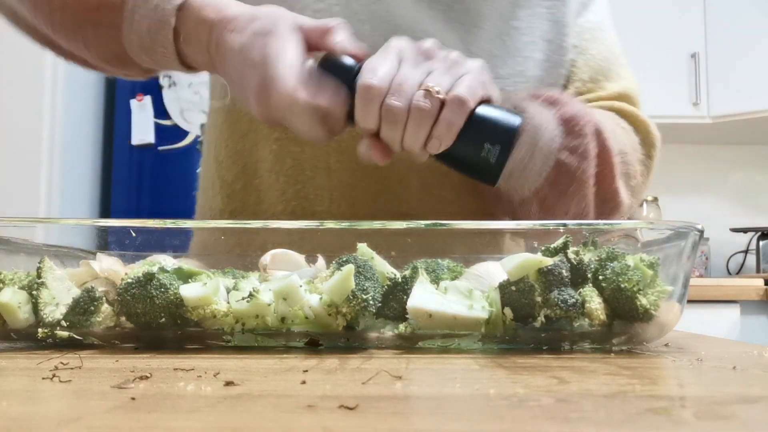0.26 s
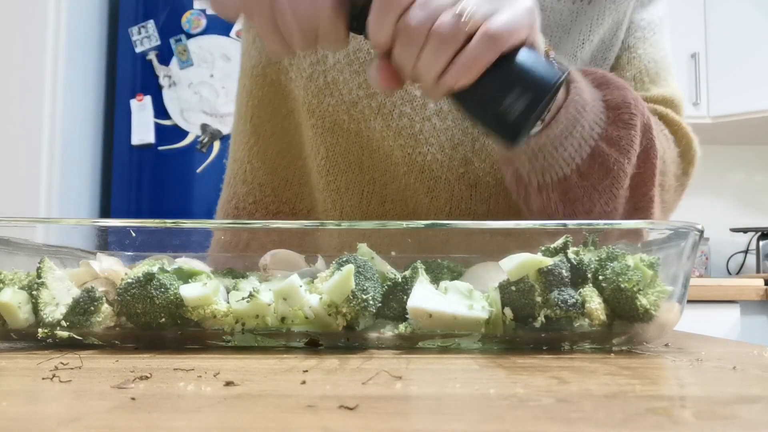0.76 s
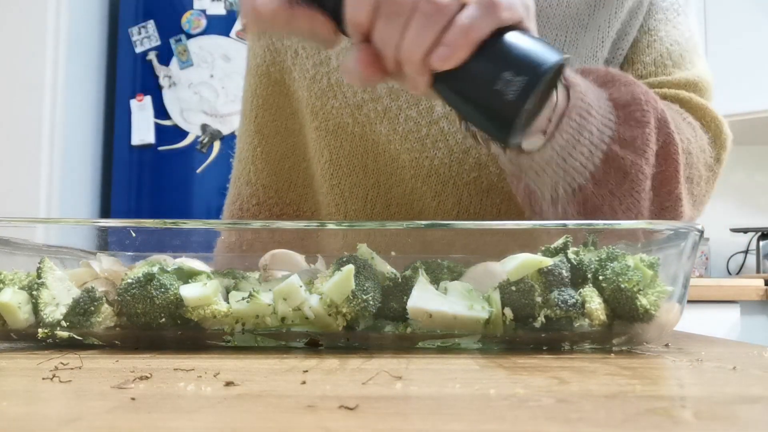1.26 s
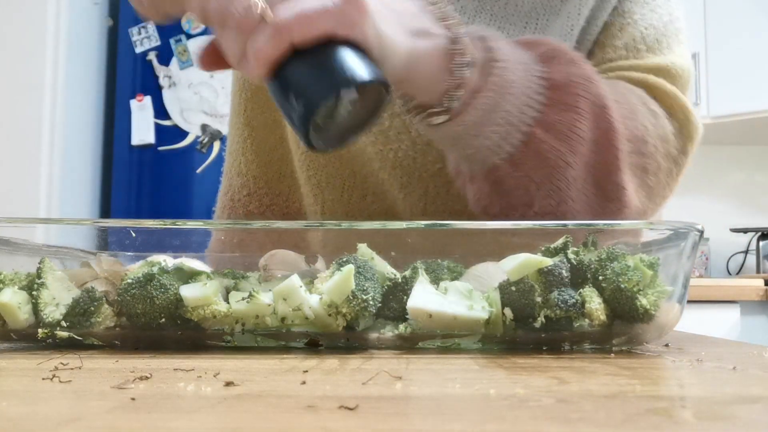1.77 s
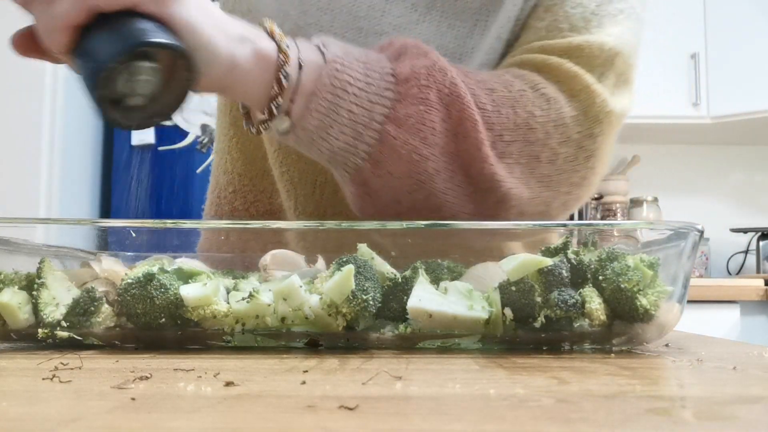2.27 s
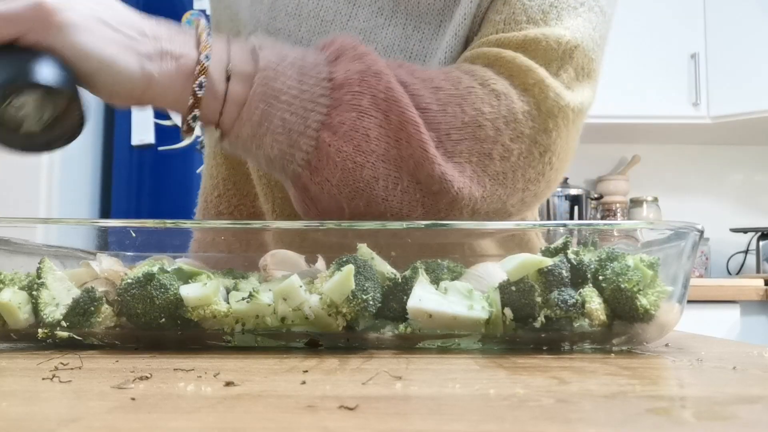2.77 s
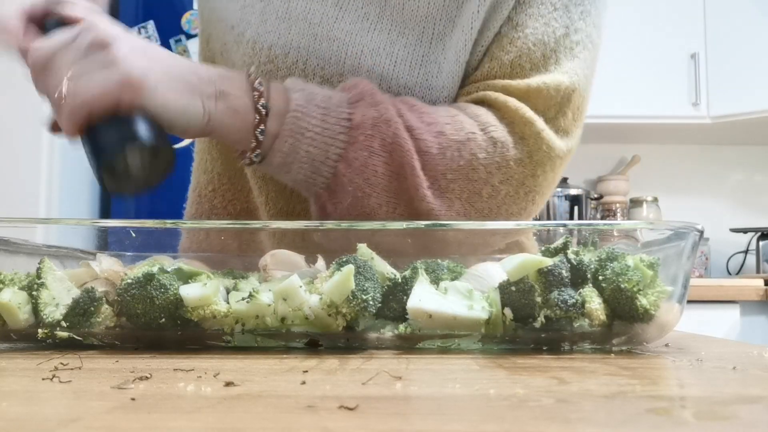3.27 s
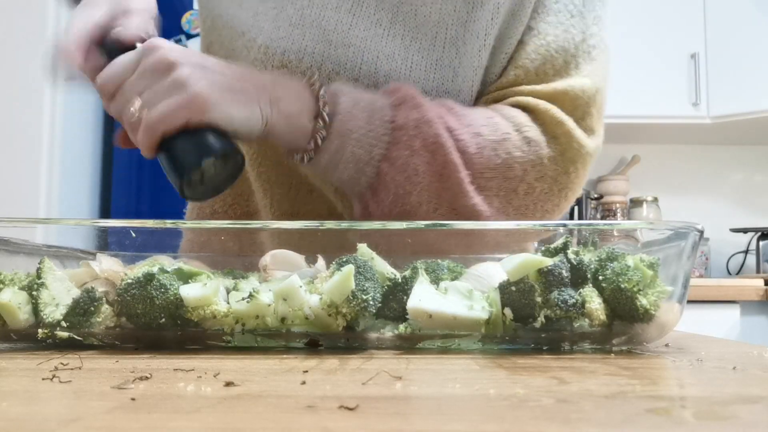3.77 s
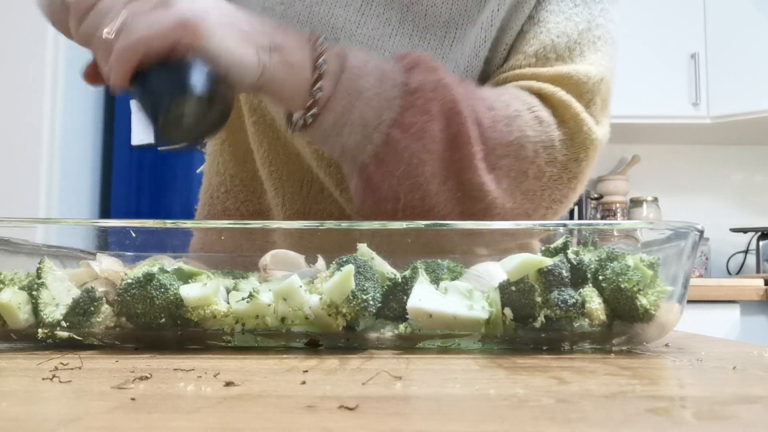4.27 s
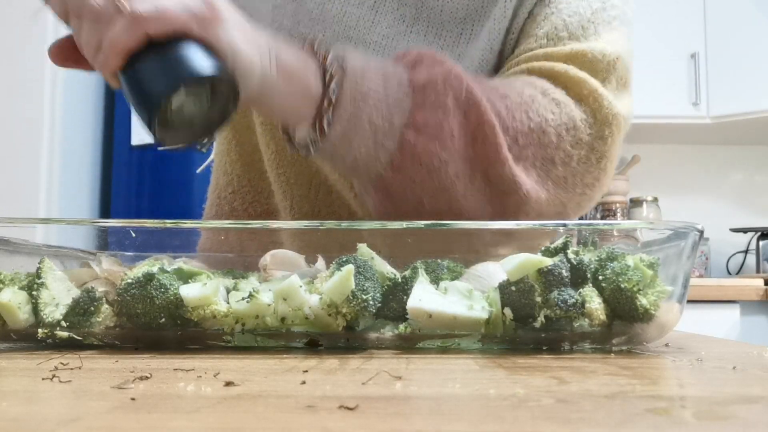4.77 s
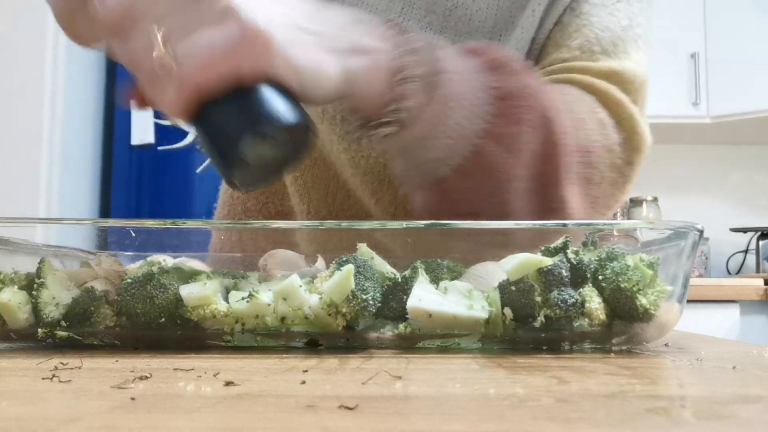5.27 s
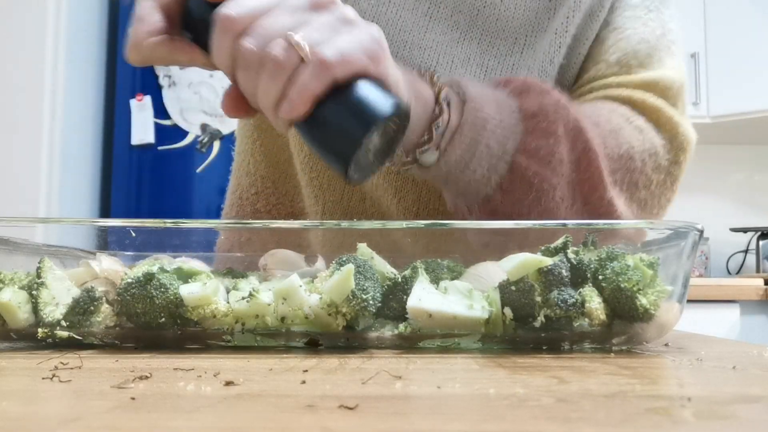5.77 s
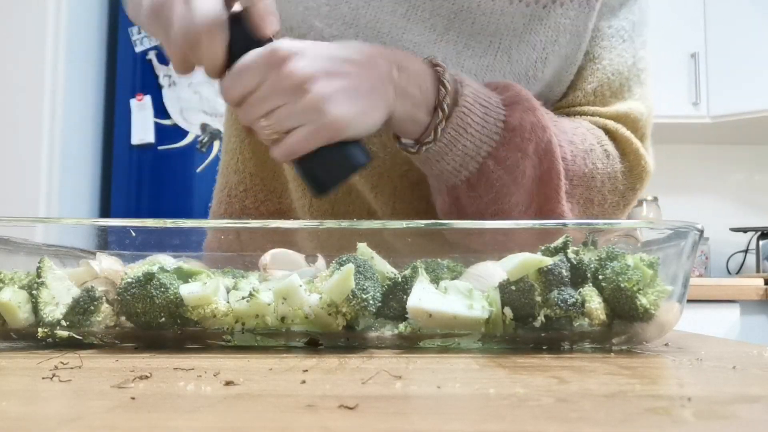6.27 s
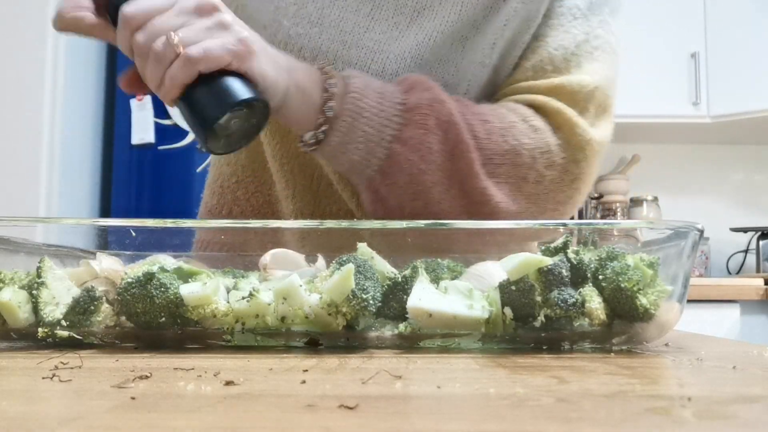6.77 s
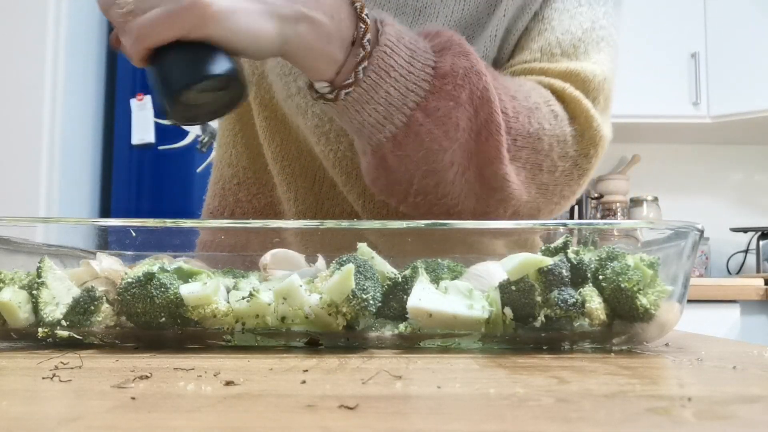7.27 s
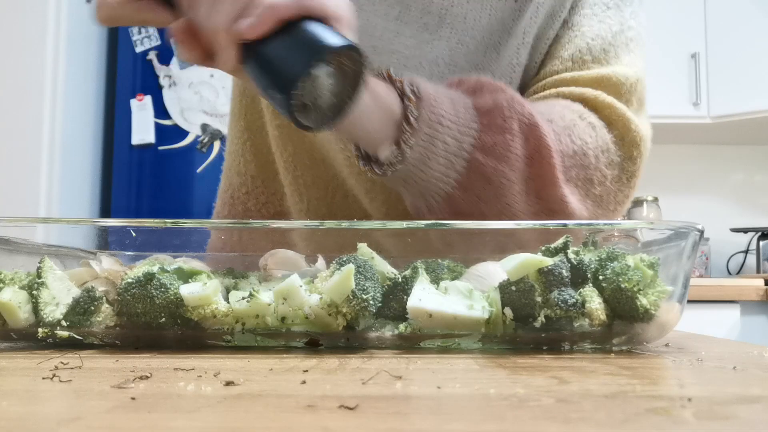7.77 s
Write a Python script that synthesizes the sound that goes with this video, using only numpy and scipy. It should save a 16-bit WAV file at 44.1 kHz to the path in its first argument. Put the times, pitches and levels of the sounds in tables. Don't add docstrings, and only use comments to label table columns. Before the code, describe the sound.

A hand pepper mill is twisted quickly back and forth close by, crunching peppercorns in steady gritty strokes with sharp little cracks in a lively kitchen.

```python
import sys
import numpy as np
from scipy import signal
from scipy.fft import rfft, irfft, next_fast_len
from scipy.io import wavfile
from scipy.ndimage import uniform_filter1d, map_coordinates

SR = 44100
rng = np.random.default_rng(int(sys.argv[2]) if len(sys.argv) > 2 else 0)


def output_pcm(signal):
    pcm = np.clip(np.atleast_2d(signal).T, -1, 1) * 32767
    wavfile.write(sys.argv[1], SR, np.round(pcm).astype(np.int16))


def natural_amplitude(level_db):
    exponent = np.asarray(level_db, float) / 20
    return 10 ** exponent


N = 353682

# start_s, left_minus_right_db, mouth_to_phone_db, loose_grip_db, burr_sizzle_db, burr_ring_db
MILL_POSE = [
    (0, 4, -7, 0, -25, 1),
    (.9, 3.5, -4.5, -6, -13, 7.5),
    (1.798, 2, -3.5, -2.5, -11, 8.5),
    (2.699, 2, 0, 2.5, -5, 6.5),
    (3.598, 1.5, 0.5, -1, -4.5, 6),
    (4.402, -1.5, -2, 0, -9, 6.5),
    (5.4, -2.5, 1, 6.5, -4, 4),
    (6.3, -2, -1.5, -4, -4.5, 5),
    (7.1, -1, -1, 2.5, -6, 5.5),
    (8.02, 0, 1, 2, -8.5, 7.5),
]
# centre_hz, width_hz, level_db
BODY_MODES = [(176, 170, -14), (340, 95, -5.5), (377, 114, -0.5), (578, 204, 3.5), (840, 147, 4.5),
              (800, 40, -6)]
SHELL_MODES = [(1210, 210, -9.5), (1420, 326, -0.5), (1936, 117, -0.5), (2440, 275, -0.5), (2904, 415, 5),
               (3694, 320, 2), (4430, 1250, -8.5)]
BURR_MODES = [(5824, 780, 13), (6320, 450, 9.5), (6770, 180, 20), (8300, 250, -24), (9500, 3300, 15.5),
              (11500, 3000, -23), (14900, 2000, -12)]
# start_s, length_s, crunch_db, body_rel_db, first_bite_rel_db
OUT_STROKES = [(0.059, 0.1, -31, -4.5, -3), (0.43, 0.085, -20.5, -7.5, -1), (0.755, 0.089, -21.5, -4, -3),
               (1.098, 0.092, -23, -6, -1), (1.454, 0.092, -23, -5, 3.5), (1.794, 0.06, -22, -8.5, 5),
               (2.11, 0.071, -24, -6, -2), (2.436, 0.076, -24.5, -6, -1), (2.787, 0.058, -25, -6, -3),
               (3.097, 0.076, -26, -6, -3), (3.404, 0.1, -26, -9.5, -2), (3.785, 0.053, -28, -3.5, -2),
               (4.067, 0.1, -28, -7.5, 5), (4.39, .085, -24, -9.5, 1.5), (4.75, .05, -29.5, -7.5, 16),
               (5.081, 0.06, -22, -7.5, 6), (5.408, .07, -26.5, -6.5, 6), (5.723, 0.067, -26, -5, 5.5),
               (6.039, 0.054, -28, -5.5, -3), (6.364, 0.088, -24.5, -2, 5.5),
               (6.72, 0.077, -26.5, -4.5, -4), (7.046, .08, -30, -7.5, 7), (7.349, 0.096, -28, -7, -18),
               (7.712, 0.042, -27.5, -11, 6)]
BACK_STROKES = [(.222, 0.11, -21.5, -7.5, 7), (.584, 0.074, -17, -7.5, -0.5), (0.924, .055, -21.5, -7, 3),
                (1.24, .11, -23.5, -5, 8), (1.589, 0.071, -21.5, -10, -9), (1.904, 0.1, -24, -4.5, 10),
                (2.24, 0.079, -23.5, -8, 4.5), (2.569, 0.08, -24.5, -6.5, 9.5),
                (2.898, 0.073, -24, -4.5, -6), (3.228, 0.067, -23, -3, -1), (3.553, 0.079, -25.5, -5, -7),
                (3.883, 0.097, -24.5, -5, 2), (4.197, 0.086, -23.5, -7.5, -9), (4.522, 0.058, -25, -4, -2),
                (4.852, 0.068, -26.5, -3, 9.5), (5.216, 0.057, -24.5, -5.5, 14),
                (5.526, .075, -28, -0.5, 14.5), (5.837, .08, -24.5, -4.5, 10), (6.167, 0.087, -26, 1, 10),
                (6.501, 0.088, -23, -3.5, 0), (6.847, 0.076, -24, -5.5, 9), (7.173, 0.074, -27.5, -3, 10.5),
                (7.484, 0.074, -25, -7.5, 7.5), (7.834, 0.088, -29.5, -2, -2)]


def on_log_axis(table, hz):
    f, v = np.transpose(table)
    return np.interp(np.log(np.maximum(hz, 1)), np.log(np.maximum(f, 1)), v)


def colour(x, table):
    n = next_fast_len(x.shape[-1])
    gain = natural_amplitude(on_log_axis(table, np.fft.rfftfreq(n, 1 / SR)))
    return irfft(rfft(x, n) * gain, n)[..., :x.shape[-1]]


def ring(x, hz, width_hz):
    r = np.exp(-np.pi * width_hz / SR)
    return signal.lfilter([1 - r, 0, r - 1], [1, -2 * r * np.cos(2 * np.pi * hz / SR), r * r], x)


def unit(x):
    return x / np.sqrt(np.mean(x ** 2, axis=-1, keepdims=True))


def hum():
    # frequency_hz, level_db
    rumble = [(20, 13), (50, 8), (120, 3), (300, -5), (1000, -27), (3000, -26), (8000, -37)]
    mid, side = colour(rng.standard_normal((2, N)), rumble)
    return unit(np.array([mid + 0.96 * side, mid - 0.56 * side])) * natural_amplitude(-51.5)


def kitchen(x, count=5, swing_s=0.045, gap_s=0.007):
    # frequency_hz, t60_s
    decay = [(100, 0.25), (400, 0.3), (1000, 0.49), (2000, 0.52), (4000, 0.59), (7000, 0.48), (14000, 0.15)]
    # frequency_hz, level_db
    cupboards = [(150, -7.5), (600, -6.5), (1500, 0.5), (3000, -2), (12000, 3.5)]
    # frequency_hz, side_minus_mid_db
    spread = [(60, -16), (200, -18), (500, -25), (900, -25.5), (1500, -7.5), (2500, -1.5), (4400, 3),
              (15000, -2)]
    tail_db, near_db, near_s = -6, -4, 0.0015
    t = np.arange(SR // 2) / SR
    tail = 0
    for hz in 100 * 2 ** np.arange(0, 7.5, 0.5):
        band = ring(rng.standard_normal((2, count, len(t))), hz, hz / 3)
        tail = tail + band * natural_amplitude(-60 * t / on_log_axis(decay, hz)) / np.sqrt(hz)
    near = rng.standard_normal(tail.shape) * np.exp(-t / near_s)
    late = colour(unit(tail * np.minimum(t / gap_s, 1) ** 2), cupboards)
    echoes = late * natural_amplitude(tail_db) + unit(near) * natural_amplitude(near_db)
    mid, side = echoes[0], colour(echoes[1], spread)
    place = np.arange(N) / SR / swing_s
    out = 0
    for k in range(count):
        away = np.abs((place - k + count / 2) % count - count / 2)
        here = x * np.cos(np.pi / 2 * np.minimum(away, 1))
        pair = np.array([mid[k] + side[k], mid[k] - side[k]])
        out = out + signal.fftconvolve(here[None], pair, axes=1)[:, :N]
    return out / np.sqrt(len(t))


def ports(x, lag_s=0.00003, bounce_s=(0.00047, 0.00044), bounce=0.22):
    def late(delay_s):
        return map_coordinates(x, [np.arange(N) - delay_s * SR], order=3)

    left = late(lag_s) + bounce * late(lag_s + bounce_s[0])
    right = x + bounce * late(bounce_s[1])
    return np.array([left, right])


def effort():
    rise_out, rise_back = 0.4, 0.59
    creep_s, creep = 0.042, 0.089
    t, speed, db = np.arange(N) / SR, np.zeros(N), np.zeros((3, N))
    twists = [(*row, rise_out) for row in OUT_STROKES] + [(*row, rise_back) for row in BACK_STROKES]
    for start, length, crunch_db, body_db, _, rise in sorted(twists):
        corners_s = [-creep_s, -0.005, 0, rise * length, length, length + 0.017]
        shape = np.interp(t - start, corners_s, [0, creep, 0.51, 0.87, 0.59, 0.06])
        speed = np.maximum(speed, shape)
        db[:, t >= start - creep_s / 2] = crunch_db + np.array([[body_db], [0], [0]])
    pose = np.transpose(MILL_POSE)
    sizzle_db = np.interp(t, pose[0], pose[4])
    return speed, db + np.array([[0], [0], [1]]) * sizzle_db


def stall(crack_s, depth=0.79, length_s=0.0022):
    marks = np.zeros(N)
    marks[((crack_s - length_s) * SR).astype(int)] = 1
    grip = np.convolve(marks, np.hanning(int(1.92 * length_s * SR)))[:N]
    return 1 - depth * np.minimum(grip, 1)


def crunch(crack_s, rate=1500, size_db=4, own_db=2.5, clump_db=2, grain_s=0.00017):
    def held(count):
        steps = np.repeat(rng.standard_normal(N // count + 1), count)[:N]
        return uniform_filter1d(steps, size=count // 2)

    speed, db = effort()
    hits = (rng.random(N) < rate / SR) * natural_amplitude(size_db * np.minimum(rng.exponential(size=N), 2.6))
    grain = np.exp(-np.arange(128) / (grain_s * SR))
    puffs = np.convolve(hits, grain)[:N] * natural_amplitude(clump_db * held(300)) * speed * stall(crack_s)
    out = 0
    for modes, group_db, trim_db in zip((BODY_MODES, SHELL_MODES, BURR_MODES), db, (-8.5, -7, -7)):
        group = 0
        for hz, width_hz, mode_db in modes:
            strength = natural_amplitude(mode_db + own_db * held(512) + 1.13 * held(3000))
            group = group + strength * ring(puffs * rng.standard_normal(N), hz, width_hz)
        out = out + unit(group) * natural_amplitude(uniform_filter1d(group_db, size=200) + trim_db)
    return out


def corns(count=3):
    # start_s, peak_db, burr_sizzle_rel_db
    splits_out = [(.4576, -7, -18), (.468, -10, -20), (.78, -8.5, -3), (.7938, -9.5, -17),
                  (.8242, -18, -14), (1.1198, -22, 4), (1.48, -16, -1), (1.7763, -16, -18),
                  (1.8082, -13, -8), (2.125, -18, -18), (2.4761, -14.5, -10), (2.7994, -17.5, -1),
                  (3.101, -24, 4), (3.1132, -17, 2), (3.4749, -20, -15), (3.7515, -20, -10),
                  (4.1108, -17.5, 6), (4.4102, -13, -3), (4.44, -15.5, 4), (4.727, -19, -12),
                  (4.7677, -16.5, -3), (5.0845, -13.5, -5), (5.0962, -22, -4), (5.4355, -25, -5),
                  (6.0495, -17.5, -10), (6.393, -22.5, 7), (7.0667, -15.5, -11), (7.0883, -13.5, 2.5),
                  (7.3793, -12.5, 1.5), (7.733, -21.5, 5)]
    splits_back = [(.332, -14.5, 1.5), (0.608, -8, 3), (0.6266, -20, 0), (.66, -18, -6), (0.9414, -9, -4),
                   (0.977, -7.5, -4), (1.3142, -14.5, -10), (1.6469, -14, -5), (1.96, -12, -1),
                   (2.3244, -18.5, -1), (2.6041, -13.5, -3), (2.942, -21, -7), (3.2603, -15, -5),
                   (3.2767, -12, 0), (3.5707, -15, -5), (3.6268, -17.5, -23), (4.233, -9, -6),
                   (4.2693, -13, -6), (4.55, -12, -0.5), (4.8634, -13.5, 0.5), (4.8892, -19.5, 10.5),
                   (4.9179, -14, 0), (5.2684, -20, 8), (5.2564, -10, -5), (5.5639, -17.5, 2),
                   (5.8787, -25.5, 15.5), (6.221, -13, -7.5), (6.5552, -18, 6), (6.8799, -13, -7),
                   (7.5344, -18, 2)]
    # start_s, peak_db, burr_sizzle_rel_db
    ticks = [(0.028, -34, -22), (0.051, -25, -21), (.0607, -29, -11), (0.0827, -13.5, -4.5),
             (0.1605, -20.5, -15), (.904, -17, -7), (1.436, -24.5, -10), (1.77, -24, -4), (2.756, -19, -8),
             (3.7727, -17, -5), (5.688, -27, -4), (2.09, -19.5, -18), (.4185, -14, -12), (2.4272, -26, -1),
             (3.0802, -20, -25), (4.7168, -47, -13), (5.055, -29.5, -11), (5.066, -21.5, -12),
             (5.2016, -20, 4), (6.1466, -20, -12), (7.333, -28, 3), (7.5841, -11.5, -2),
             (8.0131, -26.5, -7)]
    body_rel_db, burr_rel_db, spread_db = -8, -5, 1.5
    chip_db, chip_spread_db = 5.5, 2.5
    start, length, crunch_db, _, bite_db = np.transpose(OUT_STROKES + BACK_STROKES)
    when = rng.random((len(start), count))
    size = rng.standard_normal((len(start), count))
    tone = rng.standard_normal((len(start), count + 1))
    s = start[:, None] + length[:, None] * np.c_[0 * start, 0.15 + 0.8 * when]
    peak_db = crunch_db[:, None] + np.c_[bite_db, chip_db + chip_spread_db * size]
    bites_and_chips = np.c_[s.ravel(), peak_db.ravel(), burr_rel_db + spread_db * tone.ravel()]
    s, peak_db, burr_db = np.r_[splits_out, splits_back, ticks, bites_and_chips].T
    return s, peak_db, body_rel_db + spread_db * rng.standard_normal(len(s)), burr_db


def cracks(events, snap_s=(0.001, 0.0004, 0.0004), trim_db=(-9, -5, -5), own_db=2, lead_s=0.0005):
    # frequency_hz, level_db
    crack_air = [(8000, 0), (9500, 3), (12000, -2.5), (15000, 5)]
    s, peak_db, body_db, burr_db = events
    t, out = np.arange(768) / SR, np.zeros(N + 768)
    where = ((s - lead_s) * SR).astype(int)[:, None] + np.arange(768)
    groups = (BODY_MODES, SHELL_MODES, BURR_MODES)
    for modes, rel_db, snap, trim in zip(groups, (body_db, 0, burr_db), snap_s, trim_db):
        burst = t / snap * np.exp(-t / snap)
        group = 0
        for hz, width_hz, mode_db in modes:
            strength = natural_amplitude(mode_db + own_db * rng.standard_normal((len(s), 1)))
            noise = rng.standard_normal((len(s), 768))
            group = group + strength * ring(burst * noise, hz, width_hz)
        top = np.sqrt(uniform_filter1d(group ** 2, size=66).max(axis=1))
        level = natural_amplitude(peak_db + rel_db + trim) / top
        np.add.at(out, where, group * level[:, None])
    return colour(out[:N], crack_air)


def scene():
    s, *pose = np.transpose(MILL_POSE)
    pan_db, mouth_db, grip_db, _, sing_db = (np.interp(np.arange(N) / SR, s, c) for c in pose)
    events = corns()
    mill = crunch(events[0]) + cracks(events)
    mill = mill + (natural_amplitude(mouth_db) - 1) * ring(mill, 2620, 2200)
    mill = mill + (natural_amplitude(grip_db) - 1) * ring(mill, 194, 300)
    mill = mill + (natural_amplitude(sing_db) - 1) * ring(mill, 5680, 520)
    heard = ports(mill) + kitchen(mill)
    treble = heard - colour(heard, [(900, 0), (2000, -30)])
    return heard + treble * (natural_amplitude(np.array([pan_db, -pan_db]) / 2) - 1) + hum()


def roll_off(x):
    return signal.sosfilt(signal.butter(12, 16460, fs=SR, output="sos"), x)


def record(dry):
    # frequency_hz, level_db
    voice_colour = [(20, -15), (150, -5.5), (300, -1), (700, 3), (1400, -3), (7800, 5), (8600, -13.5),
                    (14900, -17.5)]
    # frequency_hz, left_minus_right_db
    lean = [(60, -2.5), (110, -0.5), (380, -0.5), (700, 0), (2380, 2), (4400, -1), (8120, -1.5),
            (15000, -9.5)]
    soft = colour(np.tanh(1.25 * dry) / 1.25, voice_colour)
    left = colour(soft[0], [(hz, db / 2) for hz, db in lean])
    right = colour(soft[1], [(hz, -db / 2) for hz, db in lean])
    low_pass = signal.cheby2(10, 40, 15550, fs=SR, output="sos")
    mix = signal.sosfilt(low_pass, np.array([left, right]))
    return roll_off(mix)


dry = scene()
out = record(dry)
output_pcm(out)
```